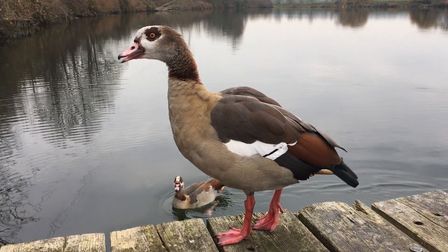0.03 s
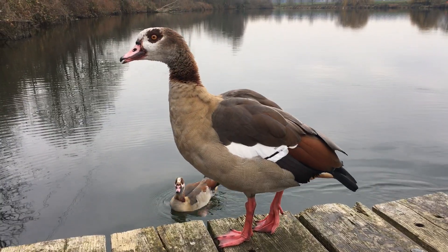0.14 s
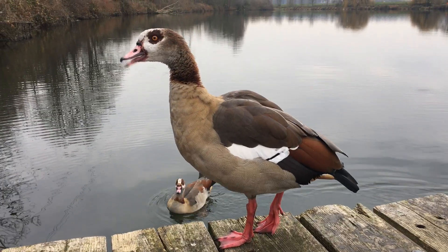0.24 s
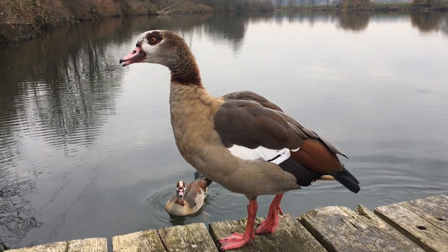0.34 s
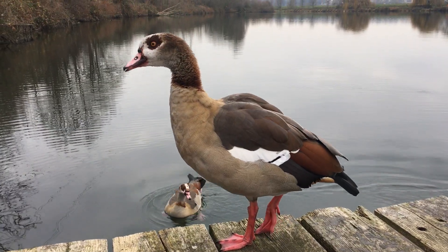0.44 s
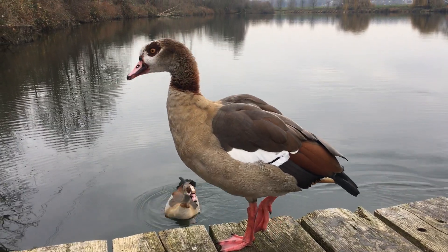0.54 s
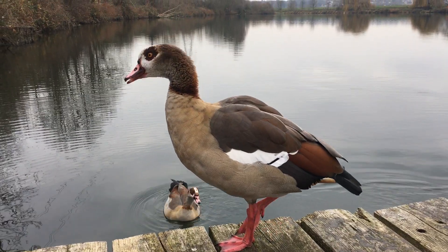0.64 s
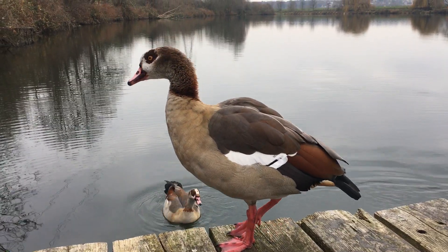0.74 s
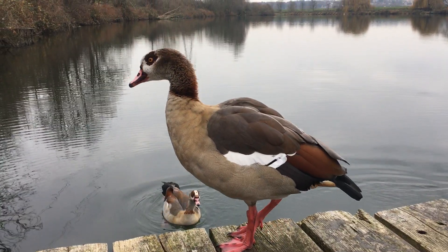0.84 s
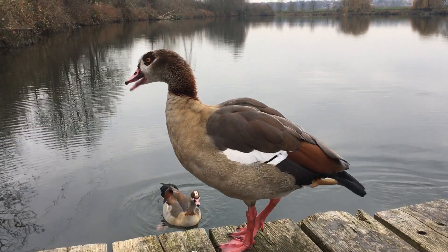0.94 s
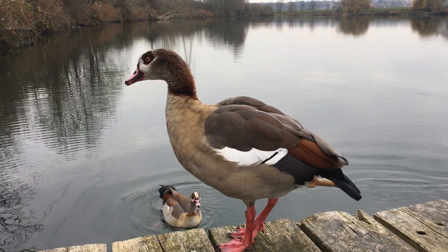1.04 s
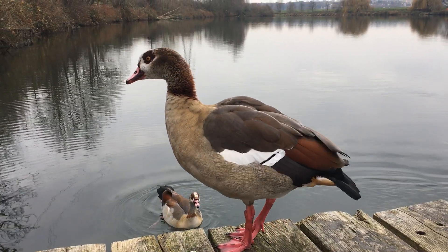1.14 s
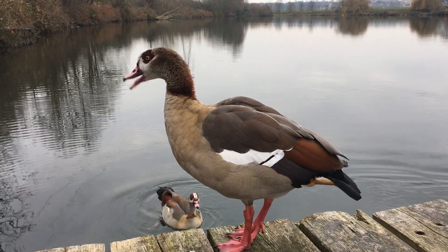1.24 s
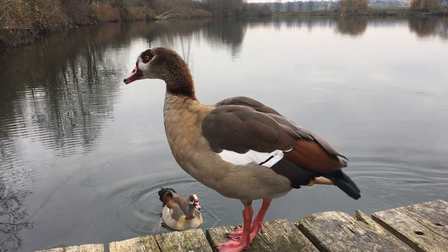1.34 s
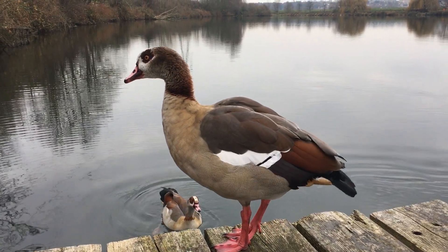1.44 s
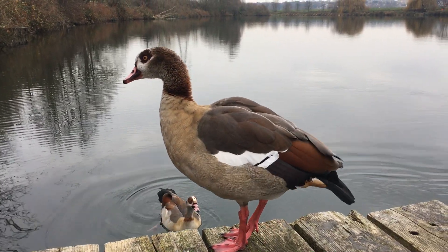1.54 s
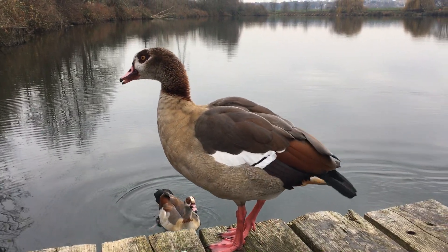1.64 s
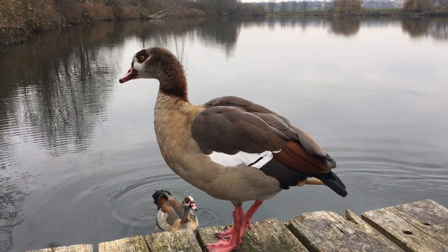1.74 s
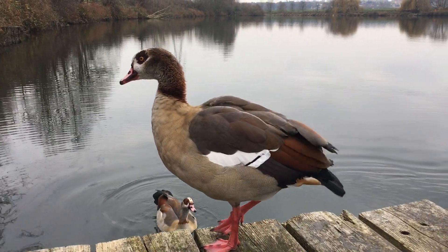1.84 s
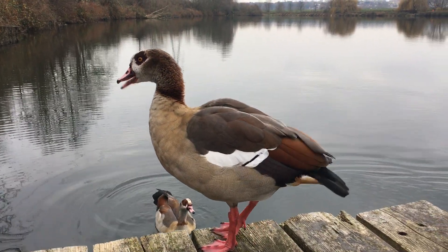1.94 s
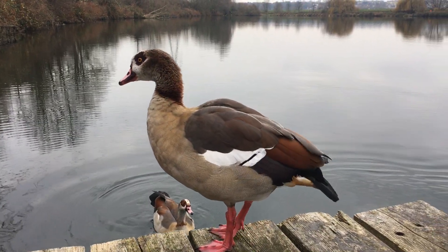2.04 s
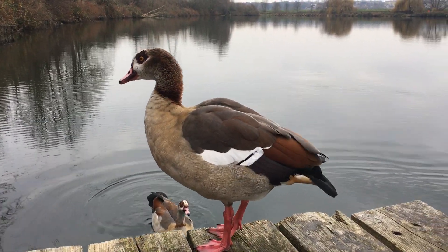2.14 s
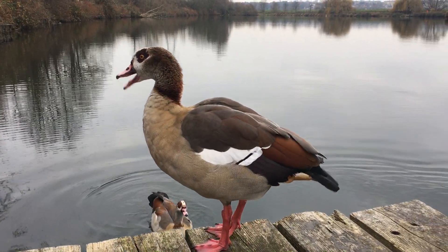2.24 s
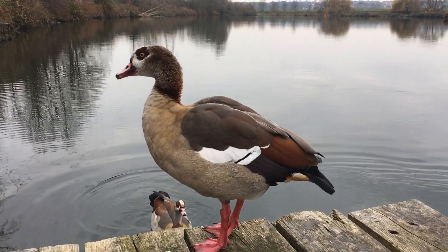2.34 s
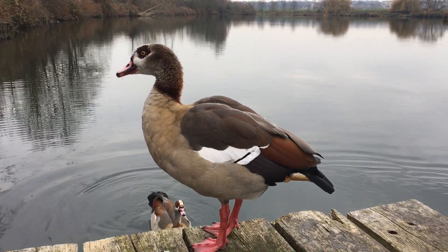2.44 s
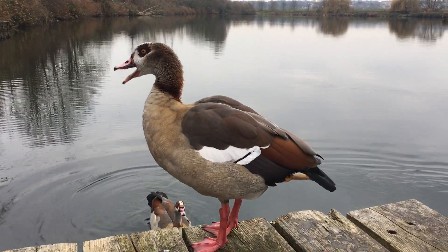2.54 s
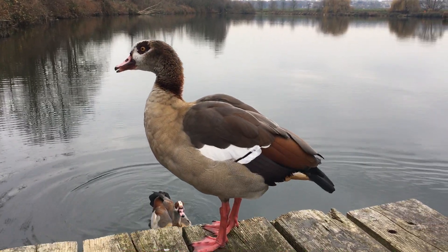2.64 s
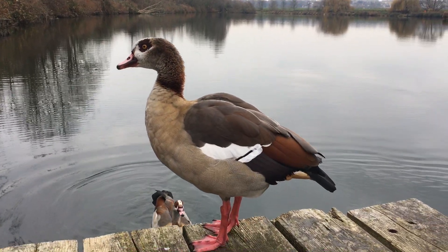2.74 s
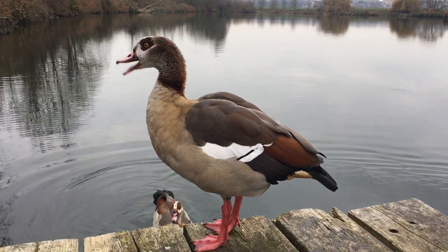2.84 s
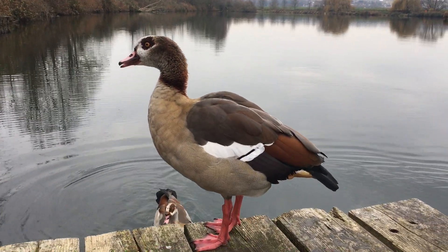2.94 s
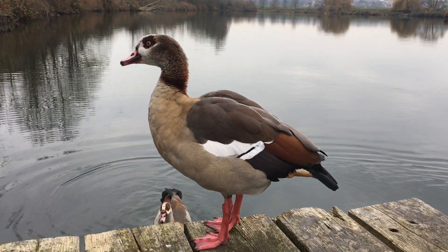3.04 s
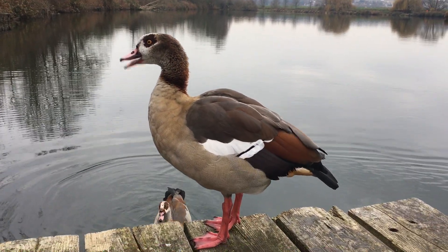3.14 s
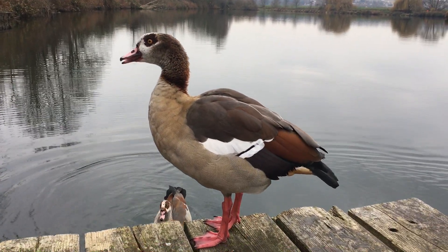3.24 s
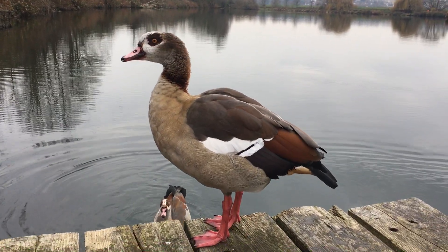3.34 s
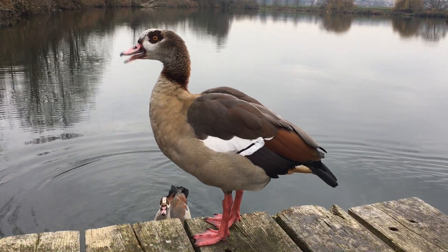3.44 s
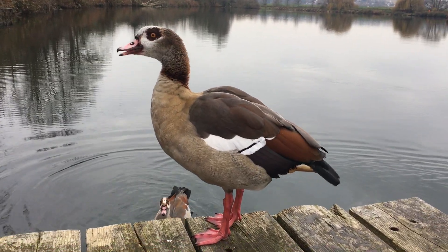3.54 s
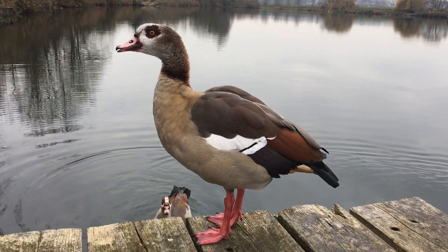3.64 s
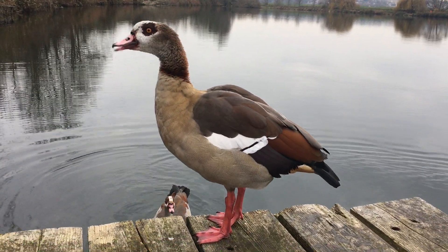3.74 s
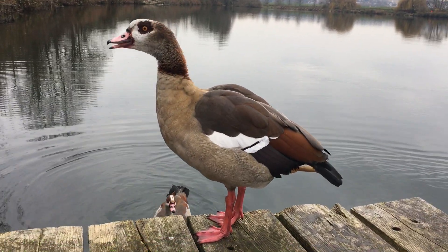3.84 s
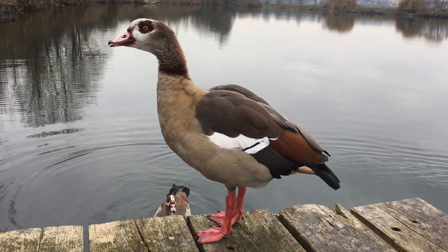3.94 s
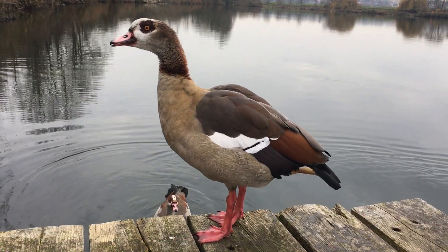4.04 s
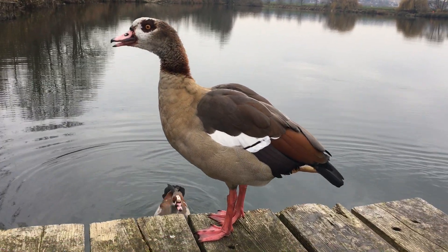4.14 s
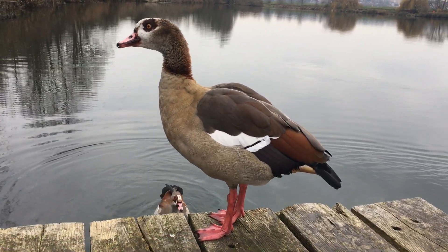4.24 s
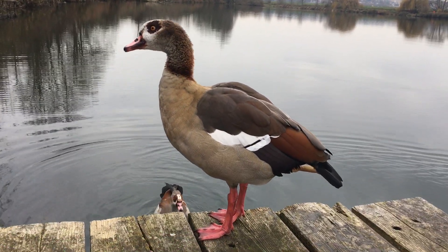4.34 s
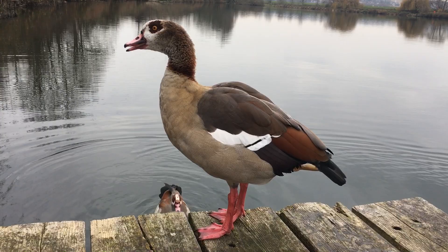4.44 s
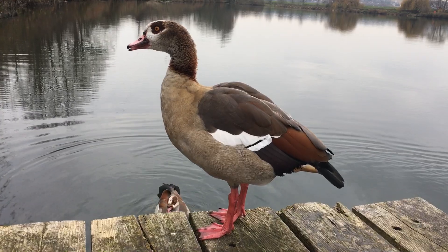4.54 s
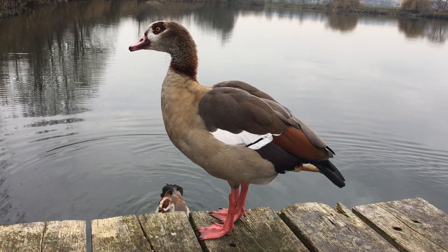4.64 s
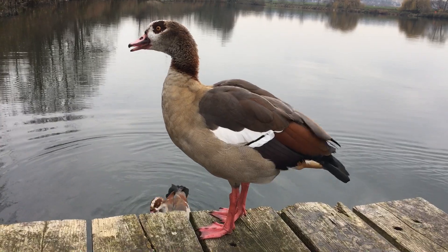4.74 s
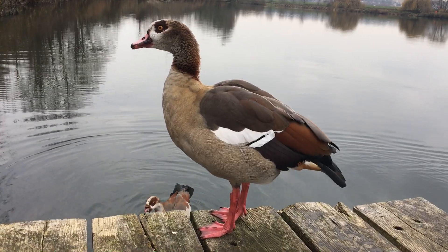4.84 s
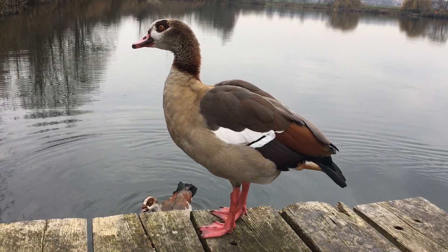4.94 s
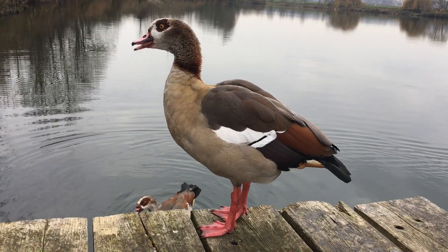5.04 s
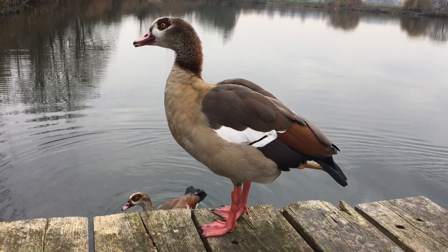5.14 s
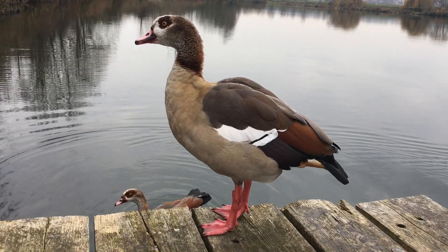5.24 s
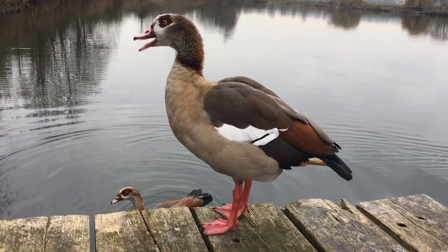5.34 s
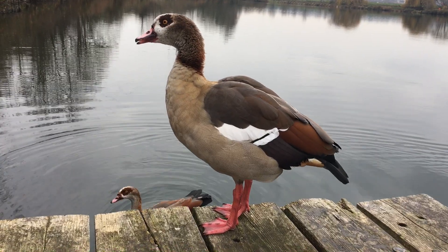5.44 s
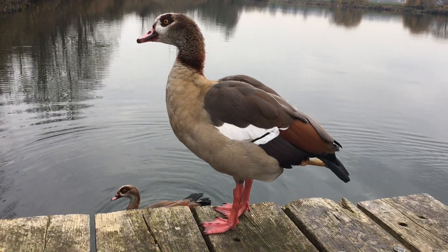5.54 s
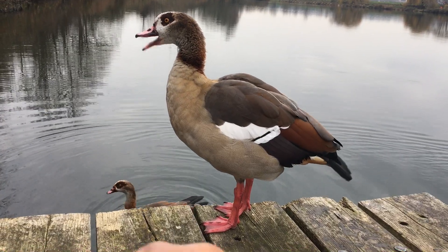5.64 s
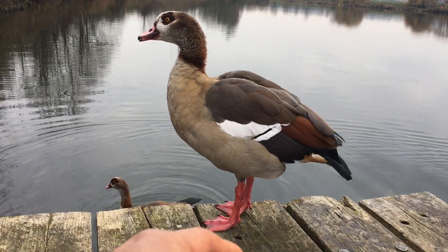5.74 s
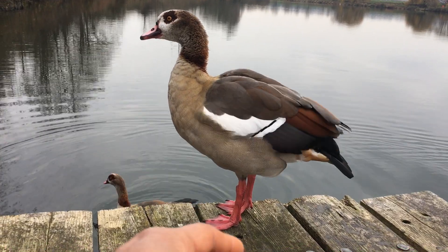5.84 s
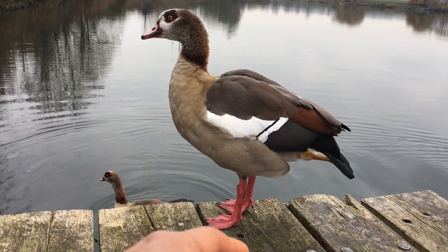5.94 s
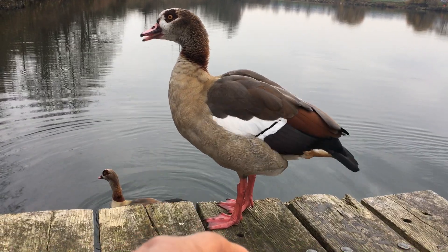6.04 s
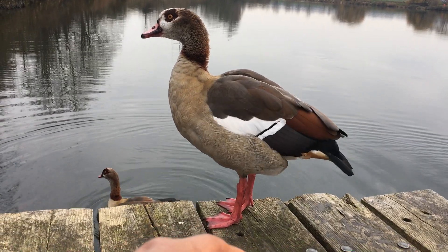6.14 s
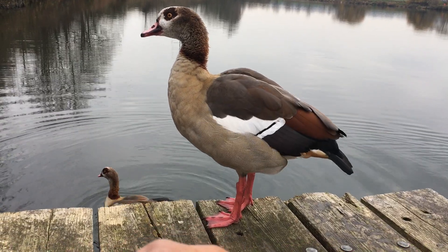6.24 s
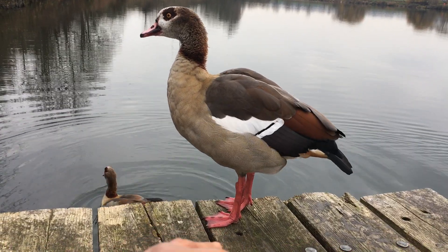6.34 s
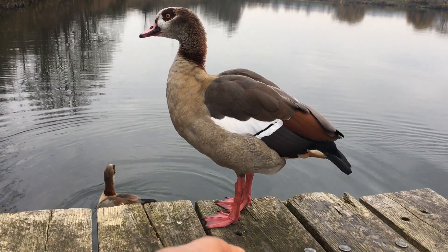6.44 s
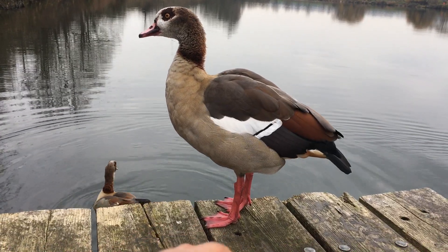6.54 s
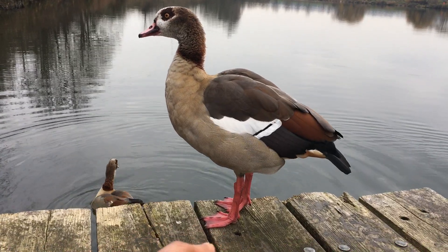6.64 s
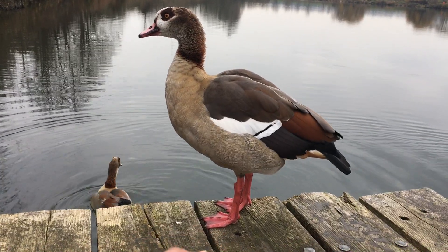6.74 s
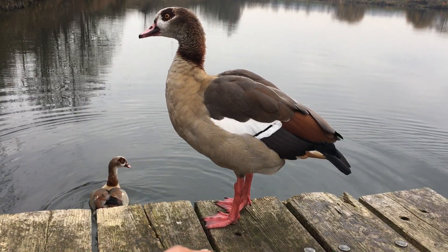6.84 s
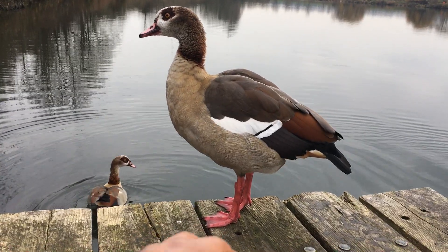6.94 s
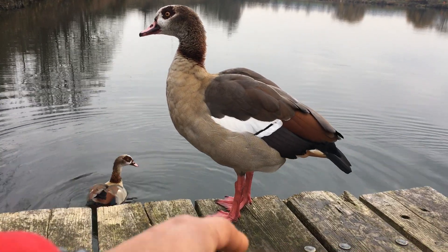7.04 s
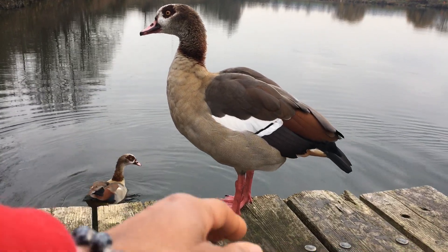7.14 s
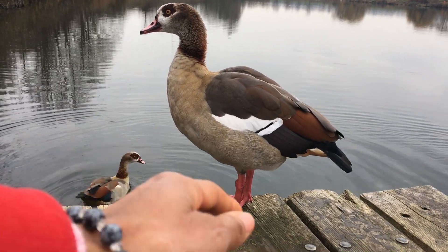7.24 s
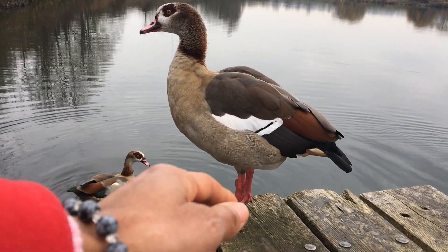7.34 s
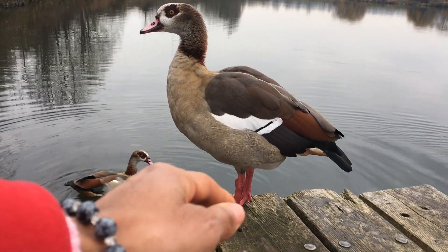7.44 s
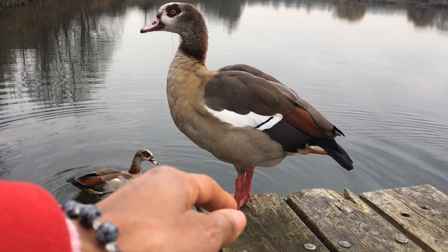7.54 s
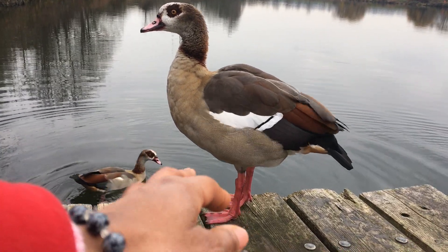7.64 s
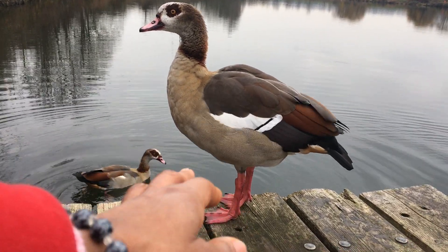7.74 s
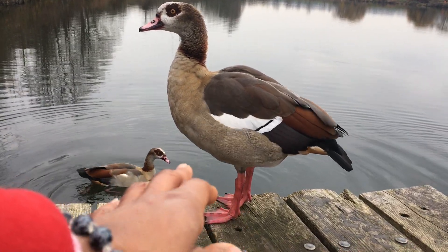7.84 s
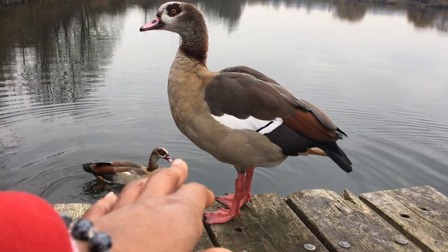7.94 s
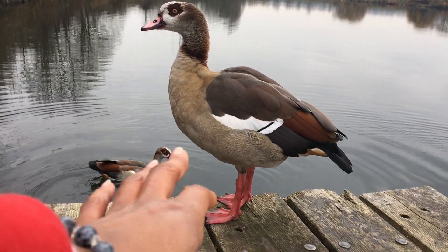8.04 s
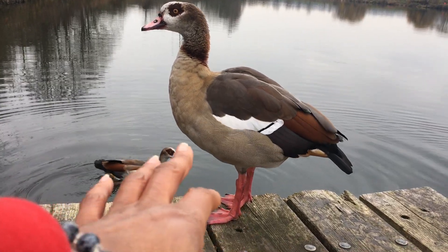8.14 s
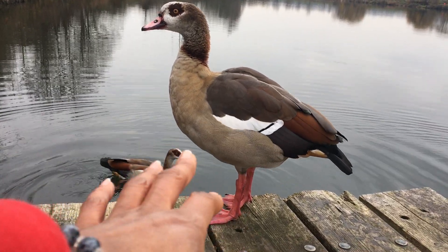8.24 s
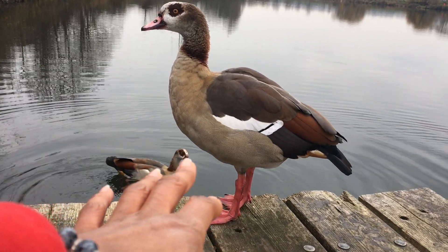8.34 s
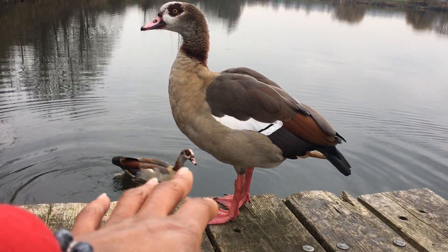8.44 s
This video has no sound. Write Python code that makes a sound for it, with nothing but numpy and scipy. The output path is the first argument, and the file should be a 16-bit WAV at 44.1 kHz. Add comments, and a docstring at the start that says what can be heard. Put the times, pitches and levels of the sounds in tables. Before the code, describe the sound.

A goose gives a steady run of short, hoarse honks up close beside a quiet lake, then falls silent.

```python
"""A goose on a wooden jetty gives twenty short, hoarse honks up close, then falls silent.
Each honk is an arch of rough syrinx pulses ringing through its throat and open bill; the boards
and the lake shore answer. A soft thump and a sharp tick are likely a footstep on the boards.
Other water birds call faintly, water laps, and a low outdoor rumble with a soft hiss lies under it all."""
import sys
import numpy as np
from scipy import signal
from scipy.fft import rfft, irfft, next_fast_len
from scipy.io import wavfile
from scipy.ndimage import map_coordinates

SR = 44100
rng = np.random.default_rng(int(sys.argv[2]) if len(sys.argv) > 2 else 0)


def put_to_file(sound):
    """Save the sound as 16-bit audio at rate SR, in the file named by the first command-line argument."""
    columns = np.atleast_2d(sound).T  # one column per channel
    safe = np.clip(columns, -1, 1)
    whole_steps = np.round(safe * 32767)
    wavfile.write(sys.argv[1], SR, whole_steps.astype(np.int16))


N = 374409

# The outdoor bed. Each row: frequency in Hz, relative noise density in dB.
AIR_COLOUR = [(12, -49), (20, -11.5), (56, -1), (93, -11), (133, -11), (203, -18), (375, -22.5),
              (408, -27.5), (570, -25.5), (1080, -34.5), (1250, -30.5), (1790, -37.5), (2120, -37.5),
              (2960, -39.5), (15800, -42)]
# A faint far tone. Each row: time in seconds, pitch in Hz, level in dB.
WHINE_PATH = [(0, 823, -84), (.6, 823, -77), (1.6, 806, -82.5), (2.9, 820, -73), (3.1, 816, -75)]
# The goose's cues. Each row: start in seconds, length in seconds, pitch near the top of the arch
# in Hz, level in dB, gape of the bill from 0 to 1, harshness from 0 to 1.
HONK_CUES = [(.0088, 0.086, 272.8, -33.5, 1, 0.88), (0.3173, .084, 276, -33.5, 0.86, 0.76),
             (0.6332, 0.088, 279.8, -34, 0.46, 0.28), (0.9667, 0.084, 271.4, -34, 0.35, 0.7),
             (1.309, 0.079, 269.2, -35.5, 0.36, .6), (1.637, 0.08, 276.8, -34, 0.02, 0.19),
             (1.965, .086, 275.9, -33.5, 0.01, 0.38), (2.2837, .087, 276.9, -34.5, 0.13, 0.53),
             (2.5928, 0.086, 280, -33.5, 0.2, 0.49), (2.9063, 0.086, 278.5, -34, 0.08, 0.64),
             (3.214, 0.082, 279, -33, 0.25, 0.49), (3.5188, 0.086, 278.2, -33.5, 0.7, .7),
             (3.8244, 0.088, 272, -34.2, 0.8, 0.87), (4.1322, 0.086, 277.2, -33.6, 0.68, .75),
             (4.4341, .087, 285, -34, 0.56, 0.38), (4.7376, 0.092, 279, -34, 0.43, 0.4),
             (5.0518, 0.09, 282, -34, 0.63, 0.42), (5.3759, 0.084, 277.9, -34, 0.58, 0.7),
             (5.7029, 0.088, 278.8, -33.5, 0.51, 0.53), (6.055, 0.083, 276.1, -35, 0.5, 0.62)]
# The voice's body, bite and fizz. Each row: frequency in Hz, relative gain in dB.
THROAT_COLOUR = [(60, -65.5), (150, -7.5), (275, -15.5), (345, -4.5), (420, -16), (490, -40.5), (620, -14),
                 (800, -7.5), (930, -7), (1120, 0.5), (1250, -2.5), (1380, -17.5), (1550, -23), (2400, -59)]
RASP_COLOUR = [(1700, -50), (2450, -18), (2780, -5), (3080, -15), (3380, -10), (3680, -14), (4000, -2),
               (4200, 0), (4450, -4), (4800, -15), (5400, -26), (7000, -50)]
HISS_COLOUR = [(4000, -45), (5800, -3.5), (6500, -1), (7300, -0.5), (7900, -3.5), (8800, -1.5),
               (9900, -7.5), (10900, -9), (12500, -11.5), (14000, -13.5), (16000, -20)]
# Tunable resonances. Each row: frequency as a multiple of the centre, relative gain in dB.
BILL_COLOUR = [(.45, -27), (.74, -32), (.85, 5.5), (.93, 7.5), (1.03, 0), (1.12, 6.5), (1.24, -8.5),
               (1.38, -17.5), (2, -62)]
UPPER_RASP_COLOUR = [(.75, -50), (.9, -18), (.96, -3), (1, 0), (1.05, -1), (1.1, -1), (1.14, -7),
                     (1.19, -22), (1.6, -50)]
# The treble drifts over the run. Each row: time in seconds, upper rasp trim in dB, its centre in Hz,
# hiss peak in Hz, trim of the lowest rasp resonance in dB.
TREBLE_DRIFT = [(0, 0, 5100, 13000, -3.5), (1.2, -3, 4930, 12500, -5), (1.8, -0.5, 5240, 13000, 2.5),
                (2.8, -1, 5070, 12500, -2), (3.6, 0, 5050, 10650, 2), (5, -1, 5120, 11000, 3.5),
                (5.5, -6, 5080, 11900, -1), (6.1, -8, 4780, 12200, -1)]
# The shore's tail. Each row: frequency in Hz, time to fall 60 dB in seconds.
SHORE_DECAY = [(300, 0.41), (1200, 0.51), (5000, 0.44), (12000, 0.38)]
# Far calls. Each row: start in seconds, length in seconds, first and last pitch in Hz, mid-call dB.
SQUEAL_CUE = (.74, .15, 1280, 960, -63.5)
WHISTLE_CUE = (7, 0.06, 850, 954, -77)
PEEP_CUES = [(7.025, .05, 2090, 2115, -80), (7.535, 0.047, 2110, 2120, -82), (8.41, .05, 2115, 2110, -82)]
HOOT_CUE = (7.1, .088, 330, 535, -60)
# The hoot's harmonics, lowest first. Each row: frequency and width in Hz (unused), relative level in dB.
HOOT_HARMONICS = [(533, 25, -10), (1070, 27, 0), (1610, 22, -11.5), (2120, 37, -26), (2680, 43, -25)]
# The soft low thump of a step on the boards, then small water laps.
# Each row: start in seconds, length in seconds, mid-swell level in dB, band centre in Hz.
STEP_AND_LAP_CUES = [(1.57, 0.12, -56.5, 119), (1.795, 0.11, -72, 6940), (3.891, 0.2, -63.5, 347),
                     (4.625, 0.2, -65, 424), (5.237, .12, -65, 715), (5.246, 0.11, -73, 2070)]
# A sharp tick on the boards. Each row: start in seconds, peak in dB before a 6 dB cut.
TICK_CUES = [(1.6249, -39.5)]

# From gape 0 to gape 1: the bill rings louder and lower, the weight comes earlier, the hiss peaks more.
BILL_DB, BILL_HZ, TILT_DB, HISS_PEAK_DB = (-5, 1.3), (1864, 1750), (0.5, -5.5), (6, 12.5)
# From harshness 0 to 1: rasp and hiss against the throat, upper rasp against the lower.
RASP_DB, HISS_DB, UPPER_DB = (-10.5, -3.5), (-23.5, -14), (-6, -1)
# Envelopes. Each: starting dip in dB, attack in seconds, hold as a share of the honk, release in dB.
THROAT_SHAPE, BILL_SHAPE = (17.1, 0.01, 0.79, 11.4), (43, 0.0051, .3, 16.8)
RASP_SHAPE, HISS_SHAPE = (83, 0.0049, .48, 14.5), (35, 0.0078, .4, 18)
RISE_SHARE, RISE_S = .39, .008  # the pitch scoops up from this share low, with this time constant
DROOP_FROM, DROOP_SHARE, DROOP_BEND = 0.49, .32, 2.7  # late in the honk it sags ever faster
RUMBLE_DB, TOP_HZ = -64.5, 15850


def amp(db):
    """Decibels to gain."""
    return 10 ** (np.asarray(db) / 20)


def unit(x):
    """Scale to rms 1."""
    return x / np.sqrt(np.mean(x ** 2) + 1e-20)


def between(ends, share):
    """The value a share of the way from one end to the other."""
    return ends[0] + (ends[1] - ends[0]) * share


def along(points, hz):
    """Read (Hz, value) points on a log axis."""
    freqs, values = np.transpose(points)
    return np.interp(np.log(np.maximum(hz, min(freqs))), np.log(freqs), values)


def curves(rows, at):
    """Read each column after the first at the given times."""
    times, *columns = np.transpose(rows)
    return [np.interp(at, times, column) for column in columns]


def wobble(rate, count):
    """A smooth random curve with rate knots a second."""
    return map_coordinates(rng.standard_normal(int(count * rate / SR) + 4),
                           [np.arange(count) * rate / SR])


def add(track, start, x):
    """Mix x into the track at start seconds."""
    i = max(0, round(start * SR))
    track[i:i + len(x)] += x[:max(0, len(track) - i)]


def filtered(x, gain):
    """EQ x with a gain that is a function of Hz."""
    size = next_fast_len(len(x) + 8192)
    return irfft(rfft(x, size) * gain(np.fft.rfftfreq(size, 1 / SR)), size)[:len(x)]


def tone(hz, harmonics_db, waver):
    """A wavering stack of harmonics that follows hz, at rms 1."""
    phase = 2 * np.pi * np.cumsum(hz * (1 + waver * wobble(120, len(hz)))) / SR
    return unit(sum(amp(db) * np.sin(k * phase) for k, db in enumerate(harmonics_db, 1)))


def air():
    """The bed: distant rumble under a smooth hiss, with a faint whine for the first three seconds."""
    t = np.arange(N) / SR
    noise = unit(filtered(rng.standard_normal(N), lambda hz: amp(along(AIR_COLOUR, hz))))
    rumble = filtered(noise, lambda hz: 1 / (1 + (hz / 400) ** 2))
    hiss = amp(-60) * (noise - rumble)
    whine_hz, whine_db = curves(WHINE_PATH, t)
    whine = amp(whine_db) * tone(whine_hz, [0], waver=.011) * (t < WHINE_PATH[-1][0])
    return amp(RUMBLE_DB + 0.74 * wobble(2.81, N)) * unit(rumble) + hiss + whine


def syrinx(t, length, pitch_hz):
    """Times and accents of the membrane beats in one honk; slack membranes beat slowly and unevenly."""
    late = np.clip((t / length - DROOP_FROM) / (1 - DROOP_FROM), 0, 1)
    slack = RISE_SHARE * np.exp(-t / RISE_S) + DROOP_SHARE * late ** DROOP_BEND
    waver = (.013 + .15 * slack) * wobble(70, len(t))
    slide = .06 * rng.standard_normal() * (t / length - .5)
    cycles = np.cumsum(pitch_hz * (1 - slack) * (1 + waver + slide)) / SR
    beat = np.arange(int(np.interp(length, t, cycles)) + 1)
    times = np.interp(beat, cycles, t)
    # every second beat is weaker and late, more so in some honks than in others
    limp = (-1) ** beat * rng.uniform(.4, 1.3) * rng.choice([-1, 1])
    jitter = (.00002 + .0002 * np.interp(times, t, slack)) * rng.standard_normal(len(beat))
    accents = .8 * limp + .6 * rng.standard_normal(len(beat))
    return np.sort(np.abs(times + jitter - .00003 * limp)), accents


def envelope(t, length, onset_db, attack_s, hold, release_db):
    """Attack, hold and an ever steeper release, in dB."""
    release = np.clip((t / length - hold) / max(1 - hold, .01), 0, 1)
    return -onset_db * np.exp(-t / attack_s) - release_db * release ** 2


def pulse_train(times, sizes, count):
    """Band-limited pulses that can land between samples."""
    places = times[:, None] * SR
    taps = np.floor(places).astype(int) + np.arange(-7, 9)
    offset = taps - places
    shape = np.sinc(offset) * np.cos(np.pi * offset / 16) ** 2
    return np.bincount(np.clip(taps, 0, count - 1).ravel(), (shape * sizes[:, None]).ravel(), count)


def resonate(x, colour, scale=1, size=2048):
    """Ring x through a minimum-phase filter of the given colour, its frequencies times scale."""
    gain = amp(along(colour, np.fft.rfftfreq(size, 1 / SR) / scale))
    cepstrum = irfft(np.log(gain))
    cepstrum[1:size // 2] *= 2
    cepstrum[size // 2 + 1:] = 0
    ring = irfft(np.exp(rfft(cepstrum)))
    return signal.fftconvolve(x, ring)[:len(x)]


def honk(start, length, pitch_hz, level_db, gape, harsh, puff_s=0.0028):
    """Slow creaky pulses speed up to a hoarse note and sag again as the bill closes."""
    count = int((length + .03) * SR)
    t = np.arange(count) / SR
    times, accents = syrinx(t, length, pitch_hz)
    tilt_db = between(TILT_DB, gape) * times / length
    # each opening lets out a short puff of turbulent air
    last_beat = np.maximum(np.searchsorted(times, t) - 1, 0)
    puff_gate = np.exp(-np.abs(t - times[last_beat]) / puff_s)
    # the membranes slap a second time at a loose moment within each beat
    slaps = times + rng.uniform(.2, .7, len(times)) / pitch_hz
    shut = np.clip(2.5 * t / length - 1, 0, 1)

    def voice(colour, shape, breath, slap, accent_db, scale=1, drop=0):
        """Pulses and puffs ring one part of the airway, tuned down by the share drop as the bill shuts."""
        sizes = amp(accent_db * accents + tilt_db + envelope(times, length, *shape))
        pulses = unit(pulse_train(times, sizes, count) + slap * pulse_train(slaps, sizes, count))
        puffs = unit(puff_gate * sizes[last_beat] * rng.standard_normal(count))
        flow = np.sqrt(1 - breath) * pulses + np.sqrt(breath) * puffs
        opened = resonate(flow * (1 - shut), colour, scale)
        closed = resonate(flow * shut, colour, scale * (1 - drop))
        return unit(opened + closed) * np.sqrt(length / t[-1])

    # the highest resonances of the mouth shift from honk to honk
    upper_db, upper_hz, peak_hz, lowest_db = curves(TREBLE_DRIFT, start)
    rasp_colour = [(hz, db + lowest_db * (hz < 3000)) for hz, db in RASP_COLOUR]
    mouth_hz = np.arange(4000, 16001, 300)
    peak_db = between(HISS_PEAK_DB, gape) * np.exp(-((mouth_hz - peak_hz) / 700) ** 2)
    mouth_db = along(HISS_COLOUR, mouth_hz) + peak_db + 3 * rng.standard_normal(len(mouth_hz))

    throat = voice(THROAT_COLOUR, THROAT_SHAPE, breath=.035, slap=.06, accent_db=1.1)
    bill = voice(BILL_COLOUR, BILL_SHAPE, breath=.06, slap=.32, accent_db=1.2,
                 scale=between(BILL_HZ, gape), drop=.06)
    lower = voice(rasp_colour, RASP_SHAPE, breath=.2, slap=.75, accent_db=2.2)
    upper = voice(UPPER_RASP_COLOUR, RASP_SHAPE, breath=.25, slap=.8, accent_db=2.4, scale=upper_hz)
    hiss = voice(np.c_[mouth_hz, mouth_db], HISS_SHAPE, breath=.55, slap=.8, accent_db=3.2)
    upper_gain = amp(between(UPPER_DB, harsh) + upper_db)
    rasp = (lower + upper_gain * upper) / np.hypot(1, upper_gain)
    edge = amp(between(RASP_DB, harsh)) * rasp + amp(between(HISS_DB, harsh)) * hiss
    return amp(level_db) * (throat + amp(between(BILL_DB, gape)) * bill + edge)


def goose():
    """The run of honks, about three a second."""
    out = np.zeros(N)
    for start, *call in HONK_CUES:
        add(out, start, honk(start, *call))
    return out


def echo(x, decay, colour):
    """Diffuse reflections, a fresh tail for each honk, every frequency dying at its own speed."""
    out = np.zeros(N)
    cuts = [0] + [int(row[0] * SR) for row in HONK_CUES[1:]] + [N]
    for begin, end in zip(cuts, cuts[1:]):
        hz, t, noise = signal.stft(rng.standard_normal(SR * 3 // 4), SR, nperseg=256)
        fade = amp(along(colour, hz)[:, None] - 60 * t / along(decay, hz)[:, None])
        bloom = 1 - np.exp(-t / 0.0014)
        tail = signal.istft(noise * fade * bloom, SR, nperseg=256)[1]
        add(out, begin / SR, signal.fftconvolve(x[begin:end], tail / np.linalg.norm(tail)))
    return out


def cry(cue, harmonics_db, waver, glide=1, bend=1, rough=0):
    """One far call swells and fades, sliding to its last note within the share glide of its length."""
    start, length, first_hz, last_hz, db = cue
    progress = np.linspace(0, 1, int(length * SR))
    hz = between((first_hz, last_hz), np.minimum(progress / glide, 1) ** bend)
    call = amp(db) * np.sin(np.pi * progress) * tone(hz, harmonics_db, waver)
    out = np.zeros(N)
    add(out, start, call * (1 + rough * wobble(460, len(call))))
    return out


def far_birds():
    """Across the water: a falling squeal, later a rising whistle, thin peeps and a scooping hoot."""
    hoot = cry(HOOT_CUE, [db for _, _, db in HOOT_HARMONICS], waver=.02, glide=.3, bend=2, rough=.4)
    squeal = cry(SQUEAL_CUE, [0, -12, -24, -26], waver=.03, bend=2.4)
    whistle = cry(WHISTLE_CUE, [0], waver=0.0083)
    peeps = sum(cry(cue, [0], waver=0) for cue in PEEP_CUES)
    return squeal + whistle + peeps + hoot


def step_and_laps():
    """A step's low thump on the boards, then small water laps: each a soft, grainy swell of noise."""
    out = np.zeros(N)
    for start, length, db, centre_hz in STEP_AND_LAP_CUES:
        count = int(length * SR)
        grains = rng.standard_normal(count) * amp(1.4 * wobble(163, count))
        band = filtered(grains, lambda hz: np.exp(-(np.log((hz + 1) / centre_hz) / .5) ** 2))
        add(out, start, amp(db) * unit(band) * np.hanning(count))
    return out


def board_tick(t60_s=0.042):
    """A sharp tick, likely a footstep on the jetty boards: a bright, fast-dying snap of noise."""
    out = np.zeros(N)
    t = np.arange(SR // 30) / SR
    for start, db in TICK_CUES:
        burst = rng.standard_normal(len(t)) * amp(-60 * t / t60_s)
        snap = filtered(burst, lambda hz: amp(along([(2000, -17), (8000, 1), (15000, -5)], hz)))
        add(out, start, amp(db - 6) * snap / np.abs(snap).max())
    return out


def scene():
    """The goose sits up front, almost dry; the far birds are washed in shore echo."""
    near = goose() + board_tick()
    far = far_birds()
    jetty = amp(-16.5) * echo(near, decay=[(300, 0.084), (5000, 0.099)],
                              colour=[(300, -0.5), (1200, -0.5), (5000, -8.5), (12000, -9)])
    shore_send = amp(-24.5) * near + amp(1.0) * far
    shore = echo(shore_send, SHORE_DECAY, colour=[(300, -5), (1200, -5), (5000, -0.5), (12000, 0.5)])
    return (near + far + jetty + shore + step_and_laps() + air())[None]


def record(dry):
    """A brick-wall high cut on the mono mix."""
    return filtered(dry[0], lambda hz: hz < TOP_HZ)[None]


dry = scene()
out = record(dry)
put_to_file(out)
```